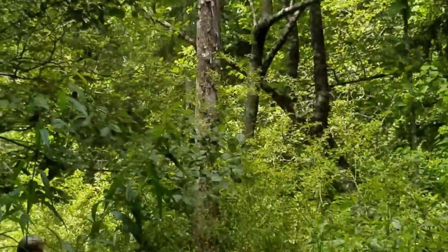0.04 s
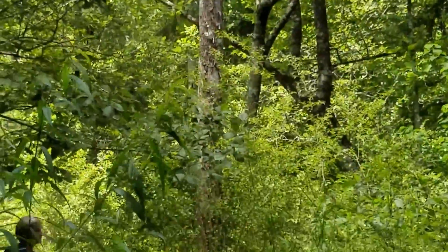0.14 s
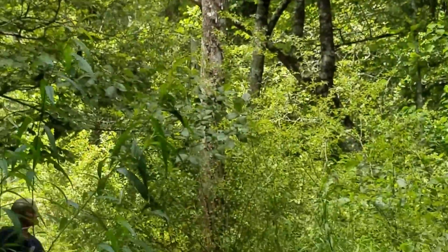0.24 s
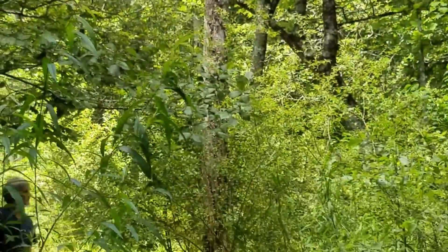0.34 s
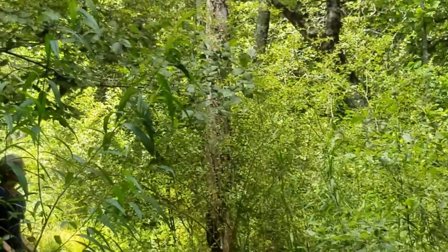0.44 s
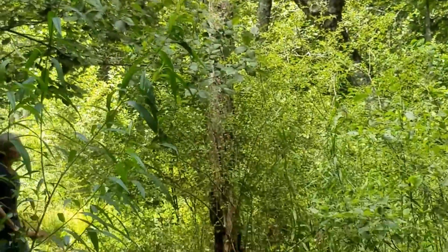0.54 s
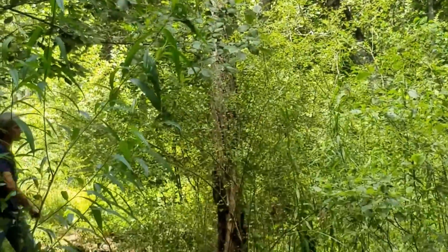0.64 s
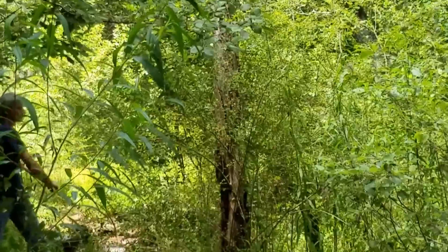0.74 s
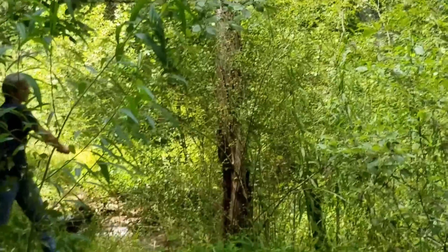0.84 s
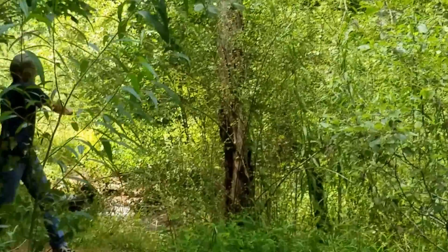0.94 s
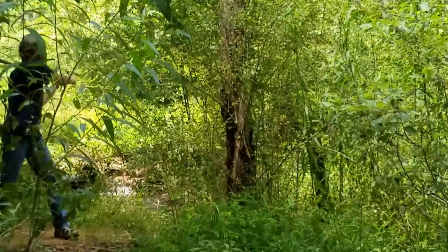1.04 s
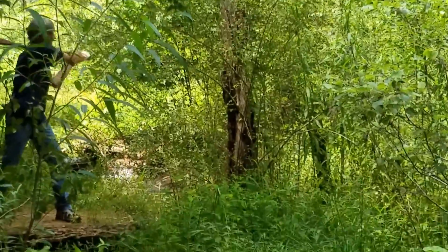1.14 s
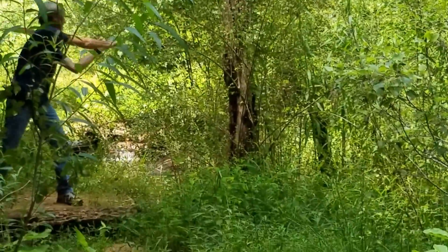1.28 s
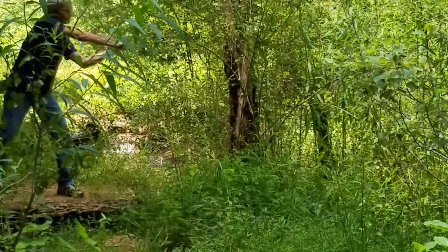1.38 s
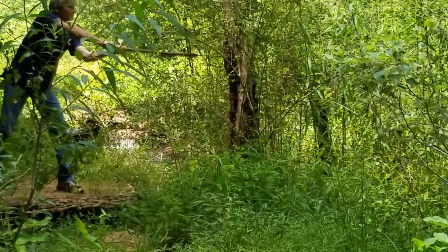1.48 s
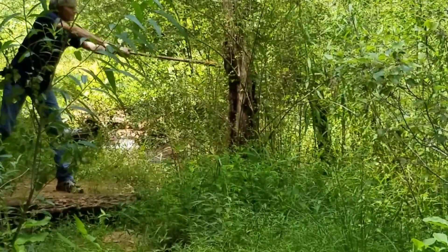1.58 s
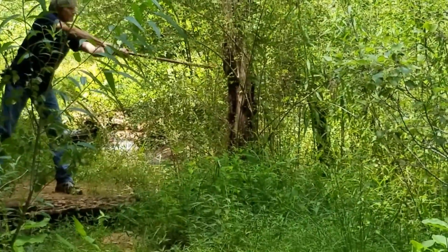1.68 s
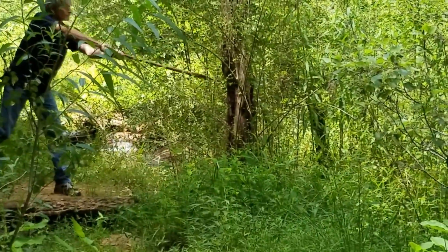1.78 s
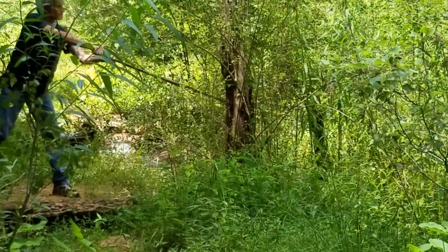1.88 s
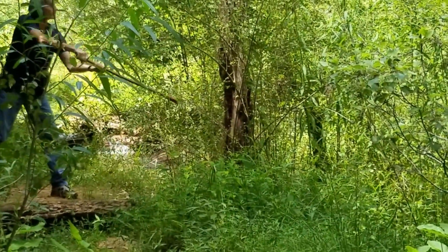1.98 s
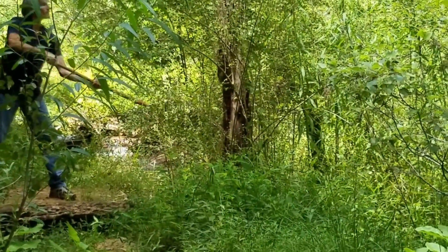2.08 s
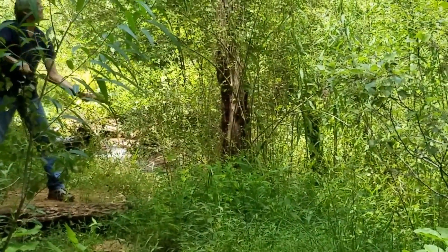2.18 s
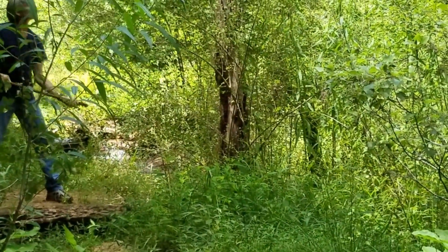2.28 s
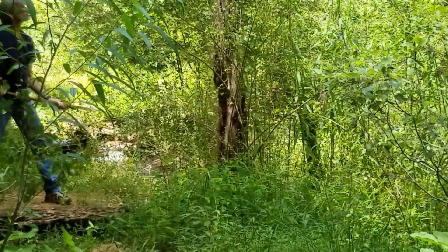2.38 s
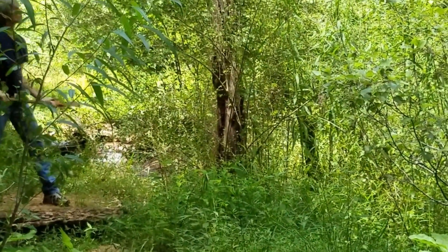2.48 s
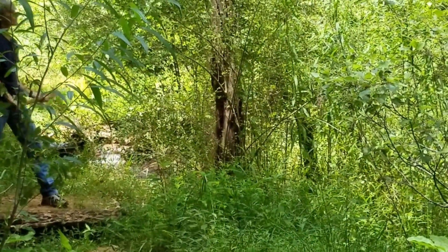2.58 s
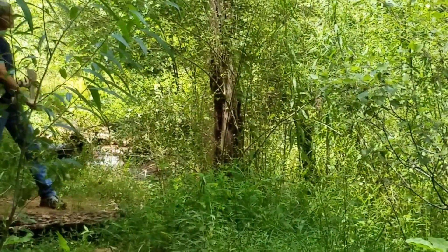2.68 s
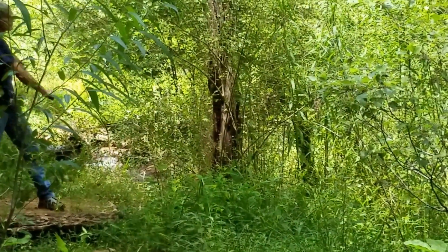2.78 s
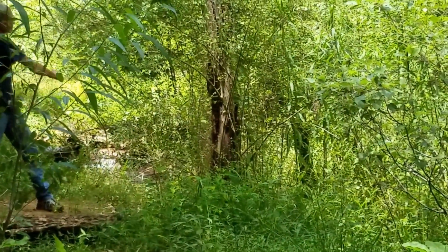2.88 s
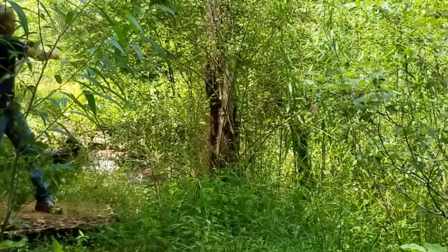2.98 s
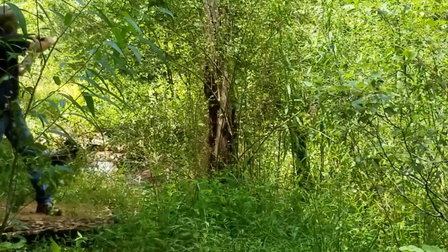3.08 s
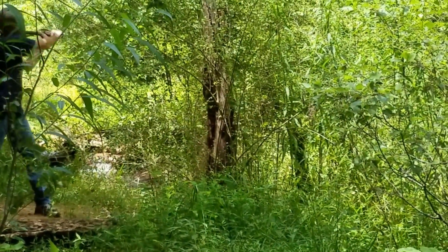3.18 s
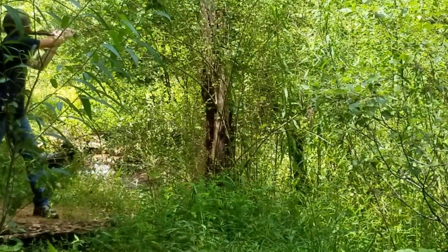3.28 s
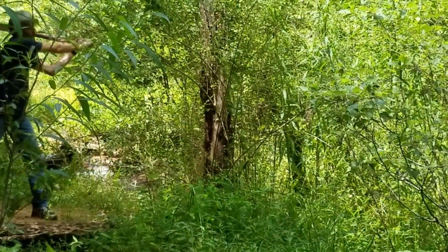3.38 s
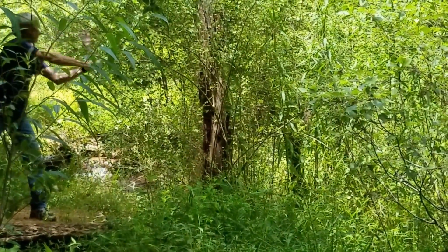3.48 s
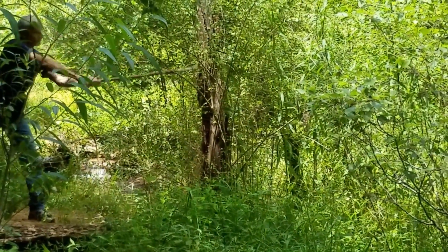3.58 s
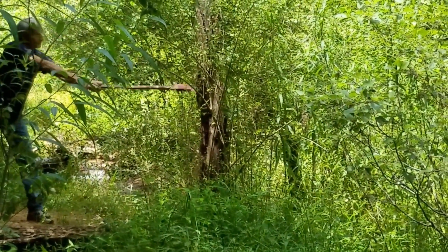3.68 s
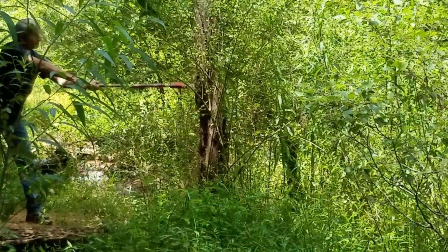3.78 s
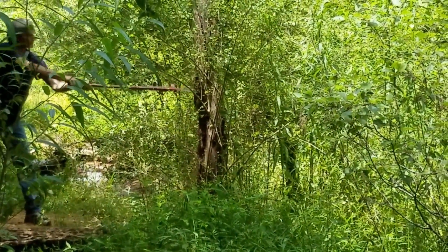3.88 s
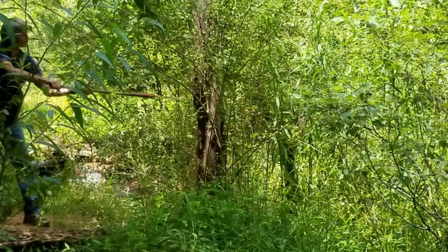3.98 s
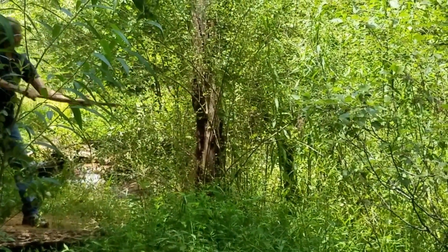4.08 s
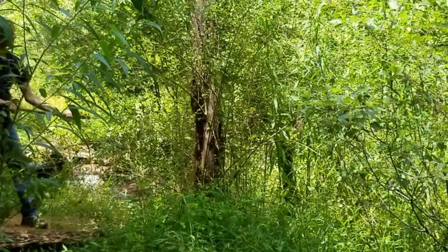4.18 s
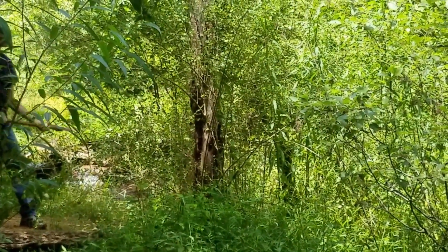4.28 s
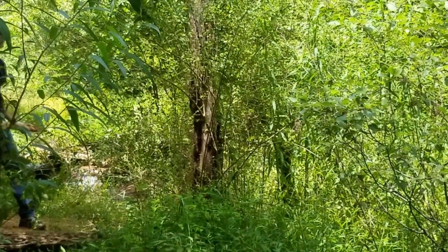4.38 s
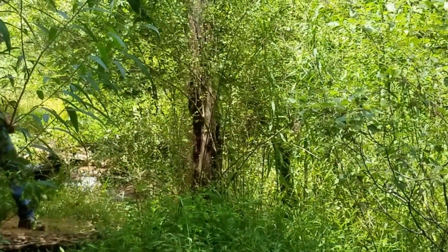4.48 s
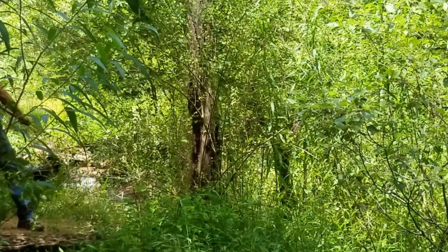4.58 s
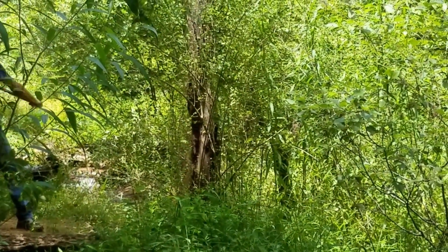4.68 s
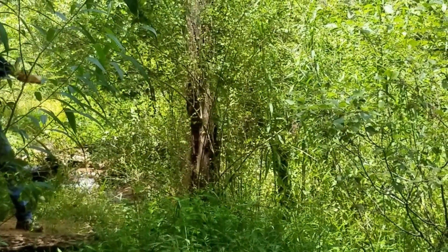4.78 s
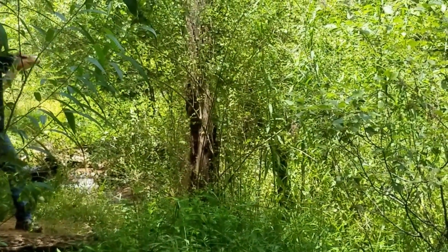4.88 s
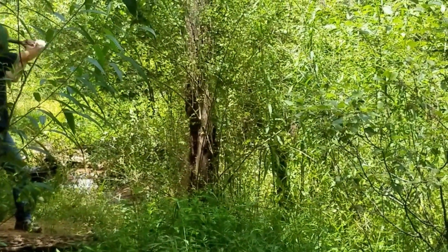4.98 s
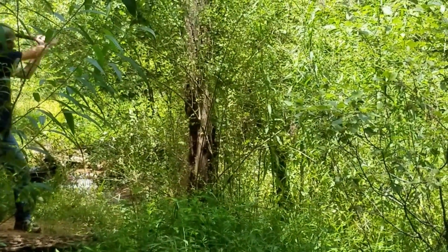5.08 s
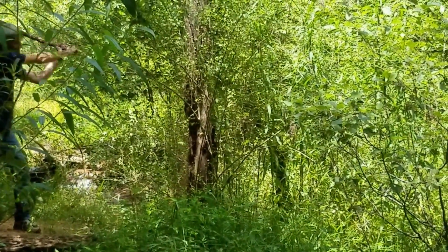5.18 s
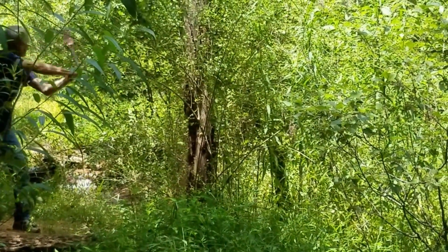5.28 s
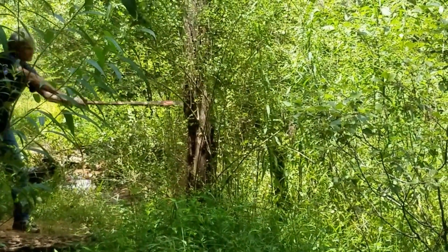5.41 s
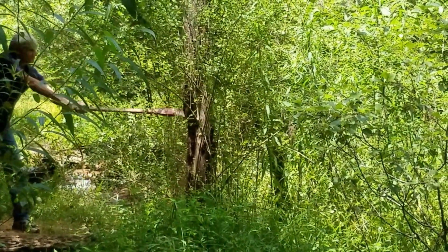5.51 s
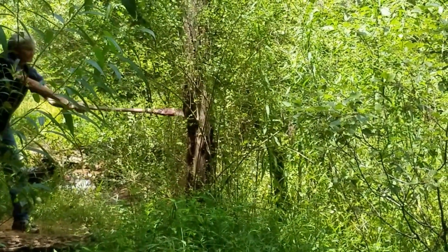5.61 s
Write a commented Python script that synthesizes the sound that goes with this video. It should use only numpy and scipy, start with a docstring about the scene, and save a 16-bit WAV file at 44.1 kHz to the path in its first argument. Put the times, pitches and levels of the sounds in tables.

```python
"""A creek hisses in summer woods amid soft rustles and short ticks; then an axe bites three times into a dead tree.
Each blow cracks the fibres (noise bursts), thumps the trunk (a falling tone) and rings the wood (decaying modes).
Dispersive bending waves return along the trunk as falling chirps; leaves and stems scatter the sound (decaying noise).
A thin bird whistle and an insect (wavering tones) join in; the creek is coloured noise with short bubble tones.
The rustles are swells of band noise and the ticks are brief noise bands."""
import sys
import numpy as np
from scipy import signal
from scipy.fft import rfft, irfft, next_fast_len
from scipy.io import wavfile
from scipy.ndimage import map_coordinates

SR = 44100
rng = np.random.default_rng(int(sys.argv[2]) if len(sys.argv) > 2 else 0)


def digitize_waveform(pressure):
    """Quantize a signal to 16-bit integers and store it at the path in sys.argv[1].

    Rows of a 2-D input are taken as channels; values are limited to [-1, 1].
    """
    field = np.atleast_2d(pressure).T
    bounded = np.clip(field, -1, 1)
    quanta = np.round(bounded * 32767).astype(np.int16)
    wavfile.write(sys.argv[1], SR, quanta)


N = 248979
T = np.arange(SR) / SR  # the second that follows an event [s]
NOW = np.arange(N) / SR  # time in the scene [s]


def amp(db):
    """Logarithmic level: decibels to amplitude gain."""
    return 10 ** (np.asarray(db) / 20)


def unit(x):
    """Normalization: scale to rms 1."""
    return x / np.sqrt(np.mean(x ** 2) + 1e-20)


def along(points, hz):
    """Interpolation of (frequency, value) points on a logarithmic frequency axis."""
    f, v = np.transpose(points)
    return np.interp(np.log(hz + 1), np.log(f + 1), v)


def curves(rows):
    """Linear interpolation in time: one curve for each column after the time."""
    s, *columns = np.transpose(rows)
    return [np.interp(NOW, s, column) for column in columns]


def add(track, s, sound):
    """Superposition: mix a sound into a track from time s."""
    start = max(round(s * SR), 0)
    part = track[..., start:][..., :sound.shape[-1]]
    part += sound[..., :part.shape[-1]]


def filtered(x, response):
    """Linear filtering: multiply the spectrum by a response of frequency."""
    size = x.shape[-1]
    padded = next_fast_len(size + SR // 4)
    spectrum = rfft(x, padded) * response(np.fft.rfftfreq(padded, 1 / SR))
    return irfft(spectrum, padded)[..., :size]


def bell(hz, centre_hz, octaves):
    """Band-pass weighting: a Gaussian on the octave scale."""
    return np.exp(-.5 * (np.log2((hz + 1) / centre_hz) / octaves) ** 2)


def swell(t, peak, steep):
    """Transient envelope: rises from t = 0 to 1 at the peak time, then dies away."""
    u = np.maximum(t, 0) / peak
    return (u * np.exp(1 - u)) ** steep


def fade(t, t60):
    """Exponential decay: falls 60 dB in t60 seconds."""
    return np.exp(-np.log(1000) * t / t60)


def wobble(rate):
    """Random modulation: a smooth curve through random knots, rate of them a second."""
    knots = rng.standard_normal(int(N * rate / SR) + 4)
    return map_coordinates(knots, [NOW * rate])


def noise(colour, alike, size):
    """Partial coherence: coloured stereo noise of rms 1, mid and side mixed to a given left-right likeness."""
    def mid_side_gains(hz):
        turn = np.arccos(np.clip(along(alike, hz), -1, 1)) / 2
        return colour(hz) * np.array([np.cos(turn), np.sin(turn)])

    mid, side = filtered(rng.standard_normal((2, size)), mid_side_gains)
    return unit(np.array([mid + side, mid - side]))


def shape(points):
    """Spectral shaping: the gain function of a (frequency, level) curve."""
    return lambda hz: amp(along(points, hz))


def brighten(x, treble_db):
    """Shelf filtering: lift or lower the treble."""
    return filtered(x, shape([(4500, 0.0099), (6500, treble_db)]))


# axe blows: (time [s], thump level [dB], thump starting pitch [Hz], ring level [dB], wood pitch factor,
# foot wave level [dB], top wave level [dB], crack level [dB], knock boost [dB], snap centre [Hz],
# crack treble [dB], split level re first burst [dB], scatter level [dB], scatter treble [dB])
AXE_BLOWS = [(1.635, -7.5, 458, -21.5, 1.0, -15, -17, -12, -2.5, 4300, 1.5, -11.5, -20.5, 3),
             (3.7369, -9.5, 414, -22, 1.08, -24.5, -27.5, -15, -16, 2590, -8.5, -13, -24, 1),
             (5.5398, -8.5, 417, -20, 1.27, -26.5, -20, -17, 1.5, 6560, 8.5, -6.5, -27.5, 6)]
# bending waves back from the foot, levels re each blow's foot wave level, centres before the wood pitch factor:
# (travel time [s], centre [Hz], width [octaves], level [dB])
FOOT_WAVES = [(.021, 715, .09, -3), (.038, 480, .12, -1.5), (.038, 200, .8, 0)]
# the one wave back from the top, with the same columns, re each blow's top wave level
TOP_WAVE = (0.07, 298, .15, -.5)


def axe():
    """Impact excitation: each blow drives the cut, the trunk and the scatter, and dull echoes follow."""
    out, trunk = np.zeros((2, N)), np.zeros(N)
    for (s, thump_db, start_hz, ring_db, pitch, foot_db, top_db, crack_db, knock_db, snap_hz,
         treble_db, split_db, scatter_db, leaf_db) in AXE_BLOWS:
        cut = amp(ring_db) * ring(pitch)
        cut = cut + amp(crack_db) * crack(knock_db, snap_hz, treble_db, split_db)
        after = amp(scatter_db) * (scatter(leaf_db) + blade())
        add(out, s, cut + after)
        waves = amp(foot_db) * returns(FOOT_WAVES, pitch) + amp(top_db) * returns([TOP_WAVE], pitch)
        add(trunk, s, amp(thump_db) * thump(start_hz) + waves)
    return out + echoes(trunk) + trunk


def thump(start_hz, push=0.008, end_hz=126, glide=0.0055, steep=2.83, sway_hz=62, sway_db=-24):
    """Bending dispersion: the trunk sways under the axe; its short waves leave first, so the pitch falls."""
    hz = end_hz + (start_hz - end_hz) * np.exp(-T / glide)
    falling = swell(T, push, steep) * np.sin(2 * np.pi * np.cumsum(hz) / SR)
    sway = amp(sway_db) * swell(T, peak=0.0083, steep=2.2) * np.sin(2 * np.pi * sway_hz * T)
    return falling + sway


# fibre burst colour before the knock, snap and treble of each blow: (frequency [Hz], spectral level [dB])
CRACK_COLOUR = [(200, -44), (600, 16), (900, 9), (1550, 0), (2800, -3), (4600, -1), (5600, -6.5),
                (6800, -11.5), (8000, -22.5), (10500, -8), (16000, -25)]
# left-right likeness of cracks and ticks: (frequency [Hz], likeness [0-1])
SNAP_LIKENESS = [(500, 0.95), (2000, 0.8), (5000, 0.13), (12000, 0.089)]


def crack(knock_db, snap_hz, treble_db, split_db, knock_hz=600, snap_db=4, bite=0.001, split=0.0138):
    """Brittle fracture: the blade bursts fibres with a knock and a snap, then the wedge splits a few more."""
    def colour(hz):
        knock = knock_db * bell(hz, knock_hz, octaves=0.76)
        snap = snap_db * bell(hz, snap_hz, octaves=0.34)
        return amp(along(CRACK_COLOUR, hz) + knock + snap)

    first = swell(T - bite, peak=0.0014, steep=1.06)
    second = amp(split_db) * swell(T - split, peak=0.0019, steep=0.99)
    return (first + second) * brighten(noise(colour, SNAP_LIKENESS, size=SR), treble_db)


# modes of the wood around the cut, before pitch factor and random level spread:
# (frequency [Hz], level [dB], t60 [s])
WOOD_MODES = [(747, -5, 0.12), (1169, 1, 0.038), (2076, -3.5, 0.044), (2540, -10, 0.072),
              (2880, -21, 0.058), (4500, -8, 0.077)]


def ring(pitch, attack=0.00071, lag=0.000072):
    """Modal vibration: the wood at the cut rings, its pitch set by the spot hit; the right microphone leads."""
    t = T + np.array([[0], [lag]])
    modes = 0
    for hz, db, t60 in WOOD_MODES:
        gain = amp(db + rng.normal(0, 2.9))
        modes = modes + gain * fade(T, t60) * np.sin(2 * np.pi * (hz * pitch * t + rng.random()))
    return modes * (1 - np.exp(-T / attack))


def bending_wave(travel, centre_hz, octaves):
    """Dispersion: speed grows as the root of frequency, giving a falling chirp, ragged from knots and splits."""
    hz = np.fft.rfftfreq(SR, 1 / SR)
    cycles = 2 * travel * np.sqrt(centre_hz * hz)  # gives the travel time as group delay at the centre
    routes = [(1, 1), (.8, .45), (1.17, .45)]  # (relative length, strength)
    arrivals = sum(gain * np.exp(-2j * np.pi * (length * cycles + rng.random())) for length, gain in routes)
    wave = irfft(bell(hz, centre_hz, octaves) * arrivals, SR)
    return wave / np.abs(wave).max()


def returns(routes, pitch):
    """Reflection: bending waves come back from one end of the trunk, pitched by the spot that is hit."""
    return sum(amp(db) * bending_wave(travel, centre * pitch, width) for travel, centre, width, db in routes)


# ringing of the steel head, re each blow's scatter level: (frequency [Hz], level [dB], t60 [s])
BLADE_MODES = [(2610, -15, 0.29), (3000, -15, 0.49), (4370, -18, .4)]


def blade():
    """Modal decay: the steel axe head rings on faintly."""
    return sum(amp(db) * fade(T, t60) * np.sin(2 * np.pi * (hz * T + rng.random((2, 1))))
               for hz, db, t60 in BLADE_MODES)


# colour of the scattered sound before each blow's treble: (frequency [Hz], spectral level [dB])
SCATTER_COLOUR = [(40, -22), (70, -5), (125, 13), (180, 13.5), (310, 8), (520, 1), (1000, -2.5), (1400, -3),
                  (2700, 0), (3700, -5.5), (4600, -0.5), (6000, -12.5), (7900, -21), (10200, -11),
                  (14000, -24)]
# left-right likeness of the surrounding sound: (frequency [Hz], likeness [0-1])
LIKENESS = [(130, 0.95), (300, 0.86), (640, 0.4), (1400, 0.0067), (6000, 0.0078)]
# decay of the scattered sound in the woods: (frequency [Hz], t60 [s])
WOODS_DECAY = [(150, 0.75), (300, 0.57), (550, 0.63), (1500, 0.73), (4000, 0.73), (11000, 0.5)]


def scatter(treble_db, nearest=0.0051, build=0.00079, low_build=0.0033):
    """Multiple scattering: near leaves return treble at once, far trunks bass later; each band decays on its own."""
    source = brighten(noise(shape(SCATTER_COLOUR), LIKENESS, size=SR), treble_db)
    hz, t, bands = signal.stft(source, SR, nperseg=512)
    build_s = along([(600, low_build), (1400, .0005)], hz)[:, None]
    arrival = 1 - np.exp(-(t + .001) / build_s)
    decay = fade(t, along(WOODS_DECAY, hz)[:, None])
    tail = signal.istft(bands * arrival * decay, SR, nperseg=512)[1][:, :SR]
    return tail * (1 - np.exp(-np.maximum(T - nearest, 0) / build))


# echoes from the edge of the clearing: (delay [s], level [dB])
CLEARING_ECHOES = [(0.199, -28), (.226, -30.5), (.33, -32), (.43, -36.5)]


def echoes(trunk):
    """Reflection: the clearing's edge returns the trunk's sound; only the low thud carries that far."""
    out = np.zeros((2, N))
    far = filtered(trunk, shape([(140, -8), (280, -0.5), (600, -6)]))
    for delay, db in CLEARING_ECHOES:
        add(out, delay, amp(db) * far)
    return out


# clear short ticks, levels before the trim: (time [s], level [dB], centre [Hz], left-right [dB])
CLEAR_TICKS = [(.066, -35, 1360, 2), (.073, -41.5, 7500, 9), (.126, -34, 420, 2), (.376, -38.5, 2270, 2),
               (.95, -43, 754, -16), (1.2985, -34.5, 2160, -4), (1.358, -39.5, 2500, -4),
               (2.29, -37, 1450, 9), (4.444, -38, 1010, -9)]
# the faint ticks, before the same trim: (level [dB], its spread [dB], centre [Hz], its spread [octaves])
FAINT_TICK_SPREAD = (-44, 1.5, 1700, .35)


def ticks(count, trim_db=-7.5):
    """Transient noise: short ticks are brief noise bands, a few clear, the others faint and at random."""
    db, spread_db, hz, octaves = FAINT_TICK_SPREAD
    faint = [(when * N / SR, db + spread_db * size, hz * 2 ** (octaves * pitch), 4 * side)
             for when, (size, pitch, side) in zip(rng.random(count), rng.standard_normal((count, 3)))]
    out = np.zeros((2, N))
    envelope = swell(T, peak=.0015, steep=.55)
    for s, level_db, centre, pan_db in list(CLEAR_TICKS) + faint:
        tick = envelope * noise(lambda hz: bell(hz, centre, octaves=0.3), SNAP_LIKENESS, size=SR)
        pan = np.array([[pan_db], [-pan_db]]) / 2
        add(out, s, amp(level_db + trim_db + pan) * tick)
    return out


# soft rustles, levels before random flutter:
# (mid time [s], half length [s], level [dB], centre [Hz], width [octaves])
SOFT_RUSTLES = [(0.025, 0.17, -47, 1240, 0.5), (0.138, 0.33, -53.5, 710, 1.0),
                (0.217, 0.066, -51, 1650, 0.1), (1.073, 0.036, -48.5, 2200, 0.67),
                (2.435, 0.013, -53, 3000, .6)]


def rustles():
    """Amplitude modulation: soft rustles are swells of fluttering band noise."""
    out = np.zeros((2, N))
    for s, half, db, centre, width in SOFT_RUSTLES:
        band = noise(lambda hz: bell(hz, centre, width), LIKENESS, size=N)
        flutter = amp(db + 2.3 * wobble(rate=81))
        out += band * flutter * np.exp(-.5 * ((NOW - s) / half) ** 2)
    return out


def note(s, start_hz, hz_per_s, rise, steep, waver_hz):
    """Frequency modulation: a thin wavering tone swells, glides evenly for up to a second and dies away."""
    hz = start_hz + hz_per_s * np.clip(NOW - s, 0, 1) + waver_hz * wobble(rate=490)
    return swell(NOW - s, rise, steep) * np.sin(2 * np.pi * np.cumsum(hz) / SR)


# the bird's two notes, levels before the quaver: (time [s], starting pitch [Hz], glide [Hz/s], level [dB])
WHISTLE_NOTES = [(3.15, 8560, -850, -64.5), (3.41, 8190, 380, -64)]


def bird(quaver_db=4.0):
    """Amplitude modulation: a far, very high whistle quavers in two drawn-out notes."""
    song = sum(amp(db) * note(s, hz, glide, rise=0.075, steep=0.66, waver_hz=70)
               for s, hz, glide, db in WHISTLE_NOTES)
    return song * amp(quaver_db * wobble(rate=50))


def insect(level_db=-61):
    """Frequency modulation: a faint wavering trill from the bushes sinks slightly in pitch."""
    return amp(level_db) * note(4.64, start_hz=4650, hz_per_s=-200, rise=.17, steep=0.53, waver_hz=80.4)


def bubbles(count, centre_hz=2300, spread=0.342, cycles=4, scatter_db=2):
    """Bubble resonance: tiny bubbles burst in the running water, each a few cycles long."""
    out, t = np.zeros((2, N)), T[:SR // 50]
    draws = zip(rng.random(count), rng.standard_normal(count), rng.exponential(size=count), rng.random(count))
    for when, pitch, size, side in draws:
        turns = min(centre_hz * np.exp(spread * pitch), SR / 9) * t  # cycles elapsed
        ping = swell(turns, cycles / 4, steep=0.2) * np.sin(2 * np.pi * turns)
        pan = np.sqrt([[side], [1 - side]])
        add(out, when * N / SR, amp(scatter_db * min(size, 4)) * pan * ping)
    return unit(out)


# background levels before the lift of each layer: (time [s], rumble level [dB], creek level [dB])
BACKGROUND_FLOW = [(0.0, -56.5, -51.5), (0.574, -63, -54), (1.55, -61, -53.5), (2.9, -62, -54.5),
                   (3.79, -62.5, -53), (5.45, -61, -53)]
# colour of the water noise: (frequency [Hz], spectral level [dB])
CREEK_COLOUR = [(180, -12.5), (300, -6.5), (431, -7.5), (631, 1.5), (1020, -1.5), (1330, -5), (1590, 2.5),
                (1940, -4), (2610, 0), (3690, -6.5), (4490, -2.5), (6460, -16.5), (8140, -20),
                (9600, -10.5), (15500, -27.5)]
# colour of the distant rumble: (frequency [Hz], spectral level [dB])
RUMBLE_COLOUR = [(15, -52), (25, -55), (48, 0.5), (103, -3.5), (134, 2), (216, -4.5), (289, -4.5),
                 (400, -10.5), (520, -46), (880, -120)]


def creek(bubble_db=-9, fizz_db=-75, leaf_db=-71, rumble_lift_db=2, water_lift_db=2):
    """Turbulent noise: the creek hisses and babbles over a low distant rumble; leaves flicker in the treble."""
    rumble_db, creek_db = curves(BACKGROUND_FLOW)
    hiss = noise(shape(CREEK_COLOUR), LIKENESS, size=N) * amp(0.19 * wobble(rate=9))
    water = hiss + amp(bubble_db) * bubbles(count=1200)
    fizz = amp(fizz_db) * noise(lambda hz: bell(hz, 15200, .2), LIKENESS, size=N)
    flicker = amp(leaf_db + 4.5 * wobble(rate=49))
    leaves = flicker * noise(lambda hz: bell(hz, 11200, 0.15), LIKENESS, size=N)
    rumble_gain = amp(rumble_lift_db + rumble_db + 0.57 * wobble(rate=4.94))
    rumble = rumble_gain * noise(shape(RUMBLE_COLOUR), LIKENESS, size=N)
    return amp(water_lift_db + creek_db) * water + fizz + leaves + rumble


def scene():
    """Superposition: the axe in its clearing, from the blows to the background."""
    return axe() + ticks(count=10) + rustles() + bird() + insect() + creek()


# sensitivity of the microphone pair: (frequency [Hz], left-right [dB])
PAIR_BALANCE = [(100, -1.5), (400, -2), (1200, 0), (2400, -5), (4400, -4.5), (8000, -0.5), (14000, -6)]


def record(dry, low_cut_hz=44, top_hz=15950):
    """Band limiting: the microphones shed deep bass and all above the top; the right one is more sensitive."""
    thin = signal.sosfilt(signal.butter(2, low_cut_hz, "highpass", fs=SR, output="sos"), dry)

    def response(hz):
        band = 1 / np.sqrt(1 + (hz / top_hz) ** 240)
        return amp(np.outer([.5, -.5], along(PAIR_BALANCE, hz))) * band

    return filtered(thin, response)


dry = scene()
out = record(dry)
digitize_waveform(out)
```